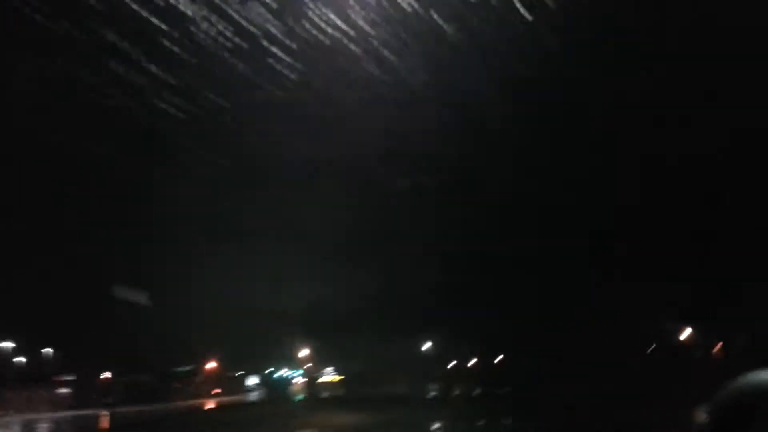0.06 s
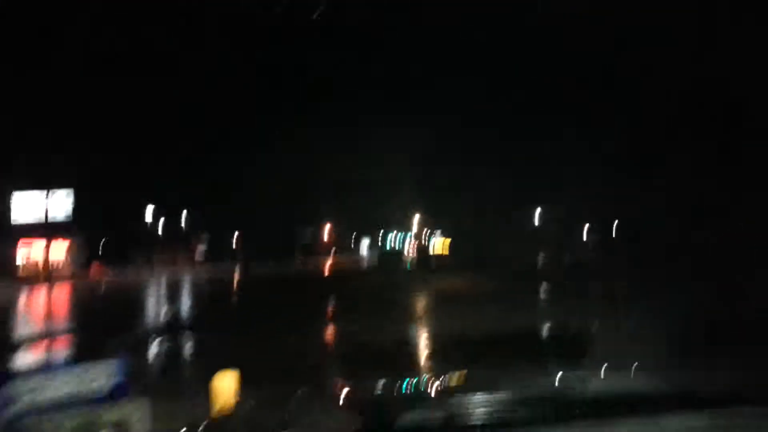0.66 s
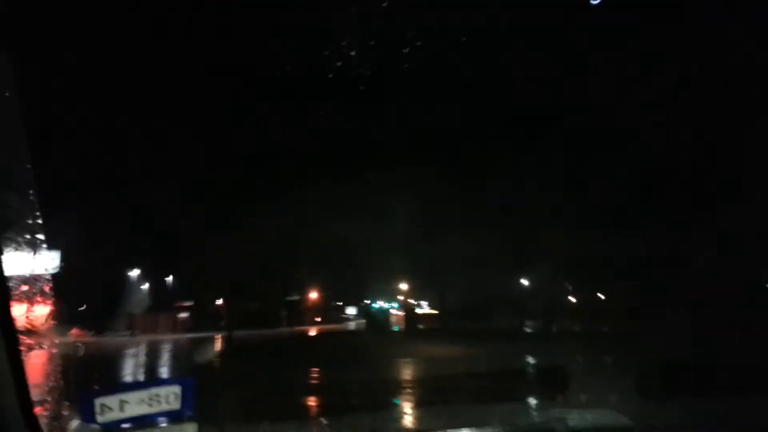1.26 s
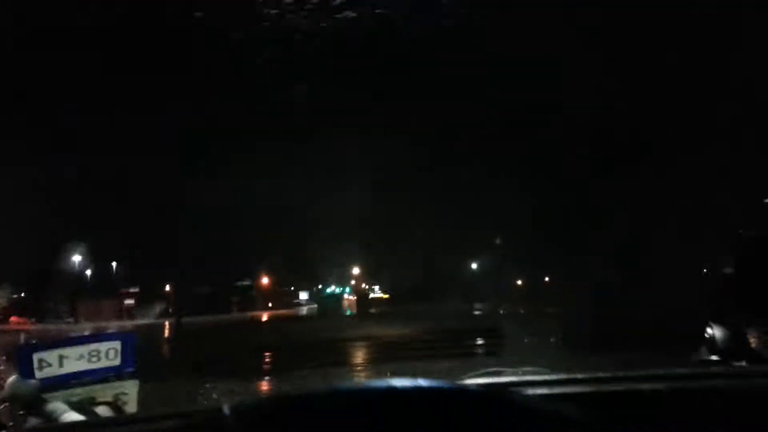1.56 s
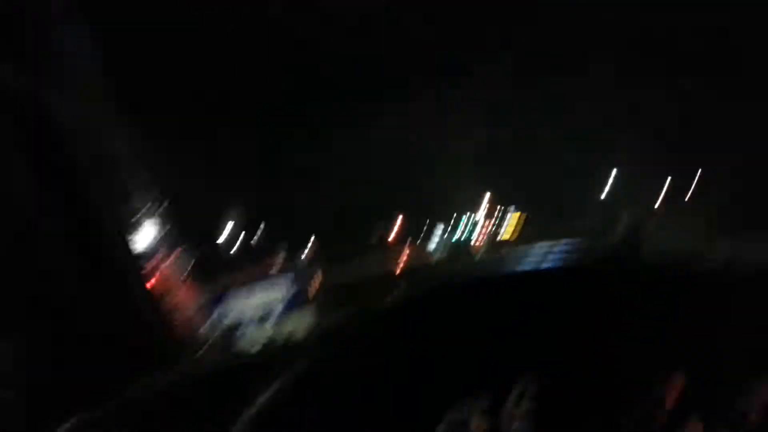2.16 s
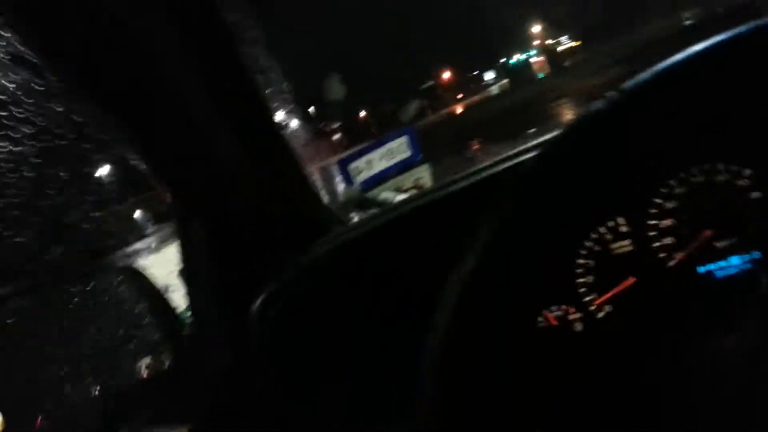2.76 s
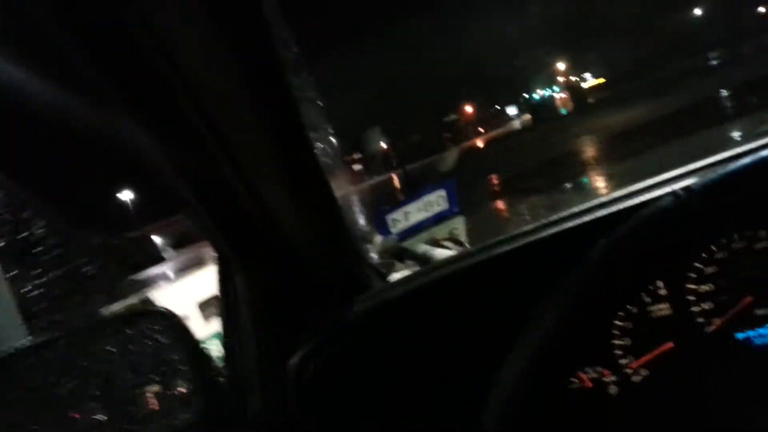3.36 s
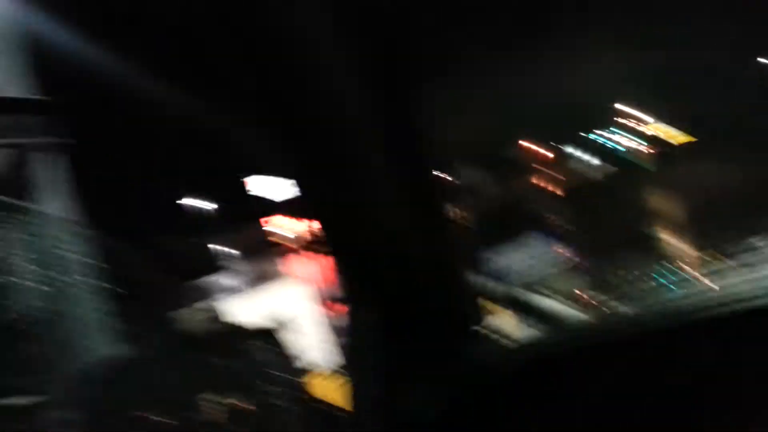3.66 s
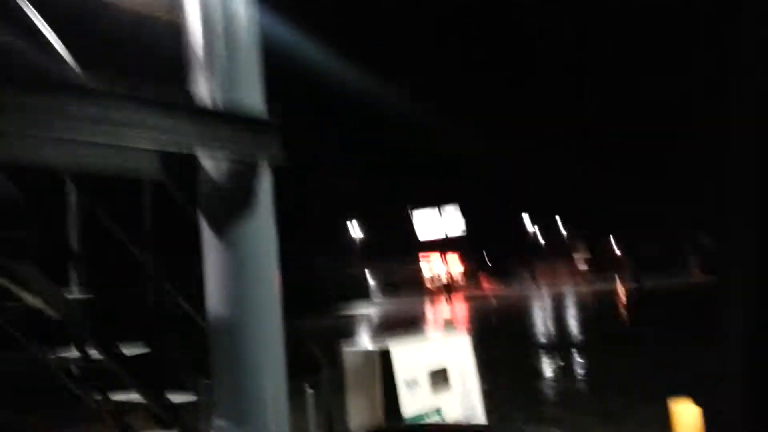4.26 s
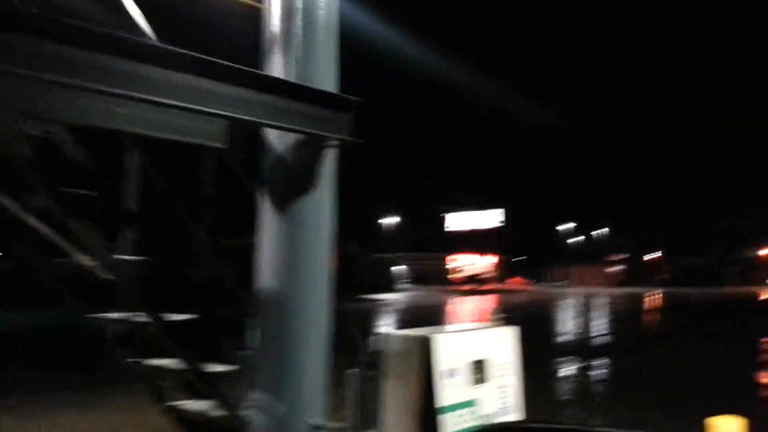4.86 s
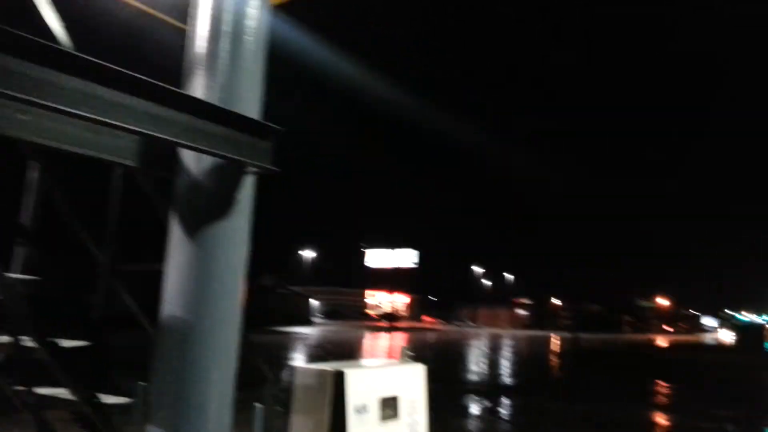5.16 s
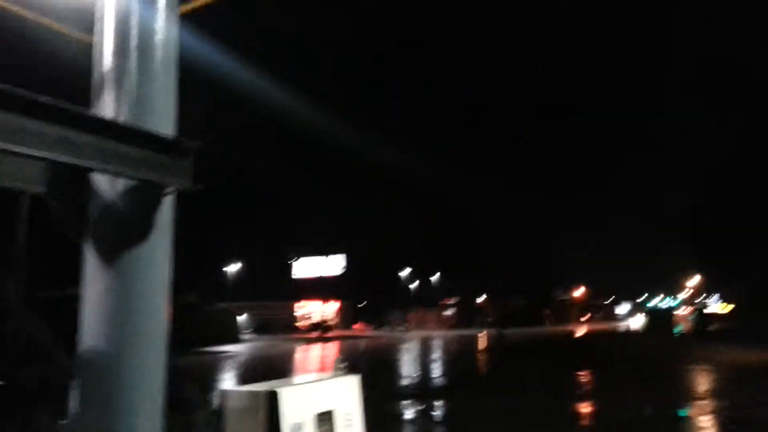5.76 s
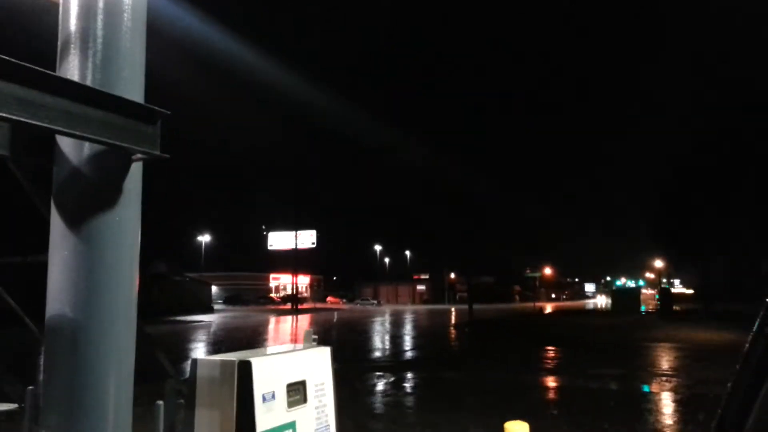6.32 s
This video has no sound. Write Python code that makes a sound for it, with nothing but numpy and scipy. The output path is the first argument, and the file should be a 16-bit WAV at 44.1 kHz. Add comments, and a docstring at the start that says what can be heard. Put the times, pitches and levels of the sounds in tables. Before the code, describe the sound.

It starts quietly inside a closed, idling car: a low rumble and faint engine hum, with rain pattering softly beyond the glass. A small plastic part clacks at the very start. A couple of light ticks and a soft knock come at about 1.1 seconds, then a sleeve brushes faintly, with a brief crackle near 1.9. From 2.4 to 2.9 seconds the door latch clicks and rattles and panels knock dully. The door opens at about 2.8 and a heavy downpour on pavement floods in, its hiss slightly to the left. The rain is hollow at first, then grows louder and fuller until about 4.8 as the microphone is carried outside. Fat drops splash close by and drips ping on thin metal. At 5.3 seconds the microphone is bumped, a dull thump with a ping. The loud, steady rain continues to the end, around 6.4 seconds.

```python
"""Seat of an idling car, night storm. Rain murmurs through the closed cabin; a few things tick, a sleeve
brushes. The latch clicks, panels knock, the door opens and the downpour on the pavement floods in from
the right: a noise wash with splashes and drips pinging on thin metal. It is hollow at first, then louder
and fuller as the microphone is carried outside, where it is bumped once."""
import sys
import numpy as np
from scipy import signal
from scipy.fft import rfft, irfft, next_fast_len
from scipy.io import wavfile
from scipy.ndimage import uniform_filter1d, map_coordinates

SR = 44100
rng = np.random.default_rng(int(sys.argv[2]) if len(sys.argv) > 2 else 0)


def generate_wav(signal):
    """Clip the signal to [-1, 1] and save it as 16-bit WAV at the path in sys.argv[1]."""
    frames = np.transpose(np.atleast_2d(signal))
    scaled = np.clip(frames, -1, 1) * 32767
    pcm = np.round(scaled).astype(np.int16)
    wavfile.write(sys.argv[1], SR, pcm)


N = 281799
TIME_S = np.arange(N) / SR

# rain strength at the microphone on its way out: time_s, level_db
RAIN_STRENGTH = [(2.82, -35.5), (2.9, -31), (3.1, -27.5), (3.21, -28), (3.3, -25), (3.42, -27),
                 (3.72, -24.5), (4.02, -22), (4.18, -19.5), (4.27, -17), (4.46, -20), (4.51, -17),
                 (4.66, -16.5), (4.85, -16), (5.4, -15.5), (5.48, -18), (5.54, -15), (5.7, -17), (5.8, -17),
                 (5.91, -20), (5.95, -16), (6.1, -15.5), (6.22, -15.5), (6.39, -15)]
OPEN_AIR_DB = -16  # that strength in the open
DOOR_OPEN_S, DOOR_SWING_S = 2.76, 0.021


def downpour():
    """Near drops on a wash of far ones. One strength drives drum, hiss and spray; rain sheets surge."""
    colour = [(30, -60), (70, -13), (130, -11), (250, 0), (400, -2), (800, 1), (1200, -2.5), (2300, -2.5),
              (3100, -7), (3900, -9), (5200, -20.5), (6500, -24), (9500, -25.5), (14500, -35.5)]  # rain spectrum: freq_hz, gain_db
    likeness = [(100, 0.93), (330, 1), (650, 1), (950, 0.55), (1600, 0.48), (2400, 0.26), (3700, 0.1),
                (5000, 0.095)]  # left-right likeness: freq_hz, correlation
    left_lag = [(3.8, 0.00034), (4.4, 0.00025)]  # left port's delay, less once it faces out: time_s, lag_s
    even_out_s, gap_loss_db, gap_widen_s = 0.15, 6.5, 0.44
    strength_db = curves(RAIN_STRENGTH)[0] - OPEN_AIR_DB
    wash = rng.standard_normal((2, N)) + amp(-7) * drops(rate_hz=1300, scatter_db=5)
    rain = spread(wash, colour, likeness)
    rain[0] = map_coordinates(rain[0], [np.arange(N) - SR * curves(left_lag)[0]], order=5)
    drum, rest = split(rain, edge_hz=1000)
    hiss, spray = split(rest, edge_hz=5930)
    # drumming comes from a wide area, which evens out the gusts
    even_db = uniform_filter1d(strength_db, int(even_out_s * SR))
    drum = unit(drum) * amp(-22 + 0.99 * even_db + 0.5 * wobble(17)) * pan(-1.2)
    hiss = unit(hiss) * amp(-17 + strength_db + 0.83 * wobble(50)) * pan(1.4)
    # the narrow door gap holds back the spray at first
    gap_db = gap_loss_db * np.exp(-np.maximum(TIME_S - DOOR_OPEN_S, 0) / gap_widen_s)
    spray = unit(spray) * amp(-33.5 + 0.63 * strength_db - gap_db + 0.87 * wobble(12)) * pan(-5.6)
    return door_open() * (drum + hiss + spray)


def near_drops():
    """Heavy drops spat on sill and mirror, each at one port; they sink into the growing wash."""
    colour = [(200, -10), (1000, 20), (3500, -1), (5500, -4), (9000, -17), (14000, -31)]  # drop spectrum: freq_hz, gain_db
    strength_db = curves(RAIN_STRENGTH)[0] - OPEN_AIR_DB
    t = np.arange(SR // 20) / SR
    splash = rng.standard_normal((2, len(t))) * decay(t, t60_s=0.035) * rise(t, tau_s=0.001)
    spatter = signal.fftconvolve(drops(rate_hz=60, scatter_db=4), splash, axes=1)[:, :N]
    return door_open() * unit(coloured(spatter, colour)) * amp(0.55 * strength_db - 34.5) * pan(-2)


def splashes():
    """Fat drops burst right by the microphone."""
    hits = [(3.046, -23.5, -7), (3.175, -23, -4), (3.645, -25, -5), (5.108, -16, -3), (5.508, -17, -1)]  # landings: start_s, level_db, pan_db
    colour = [(300, -15), (1200, 5), (2900, -10), (3700, 5), (6000, -6), (10000, -6), (14000, -18)]  # splash spectrum: freq_hz, gain_db
    return bursts(hits, colour, t60_s=0.038)


def pings():
    """Dripped-on metal and the bumped casing ring four close modes; lesser drips ping at random."""
    # drips beside the door, and the casing's ping as the microphone is bumped (5.303 s): start_s, peak_db
    strikes = [(3.769, -20.5), (3.915, -20.5), (4.266, -15.5), (4.51, -18), (4.802, -15), (5.303, -10),
               (5.515, -16), (5.556, -19), (6.045, -15.5)]
    ping_hz, ring_t60_s, lesser_per_s = 3620, 0.1, 22
    out, t = np.zeros((2, N + SR)), np.arange(SR // 8) / SR
    strength_db = curves(RAIN_STRENGTH)[0] - OPEN_AIR_DB
    open_for_s = N / SR - DOOR_OPEN_S
    hits = [(start_s, peak_db, ping_hz) for start_s, peak_db in strikes]
    for when, size, spot in rng.random((round(lesser_per_s * open_for_s), 3)):
        start_s = DOOR_OPEN_S + when * open_for_s
        peak_db = -24.5 + strength_db[int(start_s * SR)] + 10 * (size - 0.5)
        hits.append((start_s, peak_db, ping_hz * 1.1 * 2 ** -spot))
    for start_s, peak_db, ring_hz in hits:
        mode_hz = ring_hz * (1 + 0.025 * rng.standard_normal((4, 1)))
        phase = 2 * np.pi * (rng.random((4, 1)) + 0.3 * rng.random((2, 4, 1)))
        modes = np.sin(2 * np.pi * mode_hz * t + phase).sum(axis=1)
        ring = modes * decay(t, ring_t60_s) * rise(t, tau_s=0.0014)
        add_at(out, start_s, at_peak(ring, peak_db))
    return out[:, :N]


def knocks():
    """Soft blows set a panel's modes booming in a dull shudder; it is too small to radiate deep bass."""
    blows = [(1.106, -32, 262, 0.13), (2.436, -22.5, 290, 0.058), (2.507, -26.5, 221, 0.16),
             (2.594, -23, 330, 0.22), (2.626, -29.5, 431, 0.29), (2.701, -15, 450, 0.11),
             (2.719, -19.5, 261, 0.11), (2.743, -18.5, 514, 0.1), (2.768, -16.5, 134, 0.35),
             (2.865, -25.5, 150, 0.38), (5.283, -6, 244, 0.11), (5.301, -9.5, 451, 0.27),
             (5.325, -8, 338, 0.058)]  # handle, door and hand: start_s, level_db, boom_hz, t60_s
    panel = [(1, 0), (1.27, -6), (1.6, -5)]  # panel modes: freq_ratio, level_db
    low_cut_hz = 85
    out, t = np.zeros(N + SR), np.arange(SR // 3) / SR
    for start_s, level_db, boom_hz, t60_s in blows:
        dull = lambda hz: resonance(hz, 0.9 * boom_hz, q=0.9) / (1 + (hz / (2.1 * boom_hz)) ** 6)
        shudder = amp(2) * unit(filtered(rng.standard_normal(len(t)), dull))
        modes = sum(amp(db) * np.sin(2 * np.pi * (ratio * boom_hz * t + rng.random()))
                    for ratio, db in panel)
        boom = (modes + shudder) * decay(t, t60_s) * rise(t, tau_s=0.0042)
        add_at(out, start_s, at_peak(boom, level_db))
    return filtered(out[:N], lambda hz: hz ** 4 / (hz ** 4 + low_cut_hz ** 4))


def clicks():
    """Each click or crackle is a bright tick and a short rattle with its own resonance."""
    # clicks of latch, seal and casing, and one crackle of the sleeve (1.898 s):
    # start_s, rattle_db, ring_hz, ring_db, t60_s, pan_db, tick_db
    snaps = [(1.113, -31, 2700, -1, 0.018, 9, -44.5), (1.182, -36, 1060, 7, 0.052, 0, -50),
             (1.898, -34.5, 2800, 12, 0.027, 11, -52), (2.392, -28, 1740, 9, 0.049, 3, -58),
             (2.4355, -26.5, 2070, 2, 0.028, 0, -44), (2.593, -20.5, 1680, 8, 0.1, -2, -72),
             (2.661, -22, 2750, 6, 0.057, 1, -72), (2.742, -21, 1400, 5, 0.073, 2, -72),
             (2.777, -23, 3320, 2, 0.2, -4, -41), (2.88, -23, 3280, 0, 0.05, -2, -37)]
    colour = [(150, 5), (800, 13), (1400, 6.5), (2000, 3.5), (3700, 1.5), (5500, -9.5), (14000, -37)]  # rattle spectrum: freq_hz, gain_db
    out, t = np.zeros((2, N + SR)), np.arange(SR // 3) / SR
    for start_s, rattle_db, ring_hz, ring_db, t60_s, pan_db, tick_db in snaps:
        envelope = (decay(t, t60_s) + decay(t, t60_s=0.0061)) * rise(t, tau_s=0.0028)
        tone = lambda hz: amp(along(colour, hz)) * (1 + amp(ring_db) * resonance(hz, ring_hz, q=5))
        rattle = filtered(rng.standard_normal((2, len(t))) * envelope, tone)
        tick = rng.standard_normal((2, len(t))) * amp(tick_db + 3.5) * decay(t, t60_s=0.023)
        add_at(out, start_s, (at_peak(rattle, rattle_db + 1.5) + tick) * pan(pan_db))
    return out[:, :N]


def clacks():
    """A small plastic part snaps and rattles against plastic."""
    hits = [(0.0379, -21, 6), (0.0444, -22, 5), (0.0578, -31, 0)]  # strikes: start_s, level_db, pan_db
    colour = [(700, -14), (1400, -4), (1950, 2.5), (2800, -18), (3600, -11), (5700, -17), (6400, -29),
              (9100, -26), (14000, -36)]  # strike spectrum: freq_hz, gain_db
    return bursts(hits, colour, t60_s=0.019)


def cabin():
    """The body shell rumbles; rain patters faintly beyond the glass."""
    colour = [(25, -27), (55, -10), (140, 1.5), (320, -3), (650, -9.5), (1200, -15.5), (2500, -19.5),
              (3600, -19.5), (4500, -29), (6200, -36), (10000, -33.5)]  # cabin spectrum: freq_hz, gain_db
    likeness = [(120, 0.98), (350, 0.81), (600, 0.55), (900, 0.22), (3000, .03)]  # left-right likeness: freq_hz, correlation
    shell = [(0.1, -41.5), (0.45, -44.5), (0.7, -40), (0.92, -41), (1.1, -42), (1.3, -42.5), (2.15, -42.5),
             (2.4, -40.5)]  # shell rumble: time_s, level_db
    swells = [(0.1, -50.5), (0.57, -51.5), (1.25, -48), (1.57, -47.5), (2.15, -51), (2.35, -49.5)]  # rain beyond the glass: time_s, level_db
    swell_db = curves(swells)[0] - np.mean(swells, axis=0)[1]
    taps = amp(-6) * drops(rate_hz=600, scatter_db=3)
    murmur = spread(rng.standard_normal((2, N)) + taps, colour, likeness)
    rumble, patter = split(murmur, edge_hz=620)
    rumble = unit(rumble) * amp(curves(shell)[0] + 0.58 * wobble(8.92))
    return rumble + unit(patter) * amp(-47.5 + swell_db)


def cloth():
    """Fibres catch and slip near the left port; each stroke swells and fades equally fast."""
    strokes = [(1.52, -51.5, 0.22), (1.72, -52, 0.024), (1.885, -37, 0.037), (1.995, -49.5, 0.043),
               (2.26, -47.5, .022), (2.405, -44.5, 0.035), (2.542, -48, 0.0072), (3.05, -42, 0.023),
               (3.3, -44, 0.12)]  # arm reaching for the door: peak_s, level_db, tau_s
    colour = [(200, -28), (1000, 1.5), (3500, -2), (6000, -8), (10000, -7.5), (14000, -1.5)]  # fibre spectrum: freq_hz, gain_db
    envelope = sum(amp(db) * np.exp(-np.abs(TIME_S - peak_s) / tau_s) for peak_s, db, tau_s in strokes)
    catches = drops(rate_hz=900, scatter_db=3)
    fibres = coloured(rng.standard_normal((2, N)) + catches, colour)
    return unit(fibres) * envelope * pan(4)


def engine():
    """The idle hums on low multiples of a slightly unsteady firing rate."""
    harmonics = [(2, -51), (3, -53.5)]  # idle hum: firing_multiple, rms_db
    firing_hz = 38.36
    phase = 2 * np.pi * np.cumsum(firing_hz * (1 + 0.0036 * wobble(4.2))) / SR
    return sum(np.sqrt(2) * amp(db + 1.5 * wobble(2.8)) * np.sin(round(k) * phase) for k, db in harmonics)


def sleeve_rub():
    """A sleeve slides over the trim: a faint, narrow whisper that sinks in pitch."""
    slide = [(1.1, 1770, -61), (1.42, 1468, -55.5), (1.72, 1430, -57), (1.9, 1410, -72)]  # sleeve on trim: time_s, pitch_hz, level_db
    half_width_hz = 82
    pitch_hz, level_db = curves(slide)
    flutter = filtered(rng.standard_normal((2, N)), lambda hz: 1 / (1 + (hz / half_width_hz) ** 4))
    whisper = unit(flutter * np.sin(2 * np.pi * np.cumsum(pitch_hz) / SR))
    sliding = (TIME_S > slide[0][0]) & (TIME_S < slide[-1][0])
    return whisper * amp(level_db) * sliding


def hollows(x):
    """Two hollows ring in and out as the microphone moves through them."""
    nook = [(144, 39, 7.5), (910, 190, 4.5), (1493, 200, 4.5), (2098, 192, 8), (3530, 200, 4.5)]  # modes between wheel, window and door: centre_hz, width_hz, gain_db
    in_nook = [(1.0, 0.11), (1.4, 0.6), (1.75, 0.44), (2.099, 0.079), (2.7, 0.16), (3.0, 0.58), (3.8, 1),
               (4.4, 0.56)]  # part heard through the nook: time_s, share
    doorway = [(516, 86, 3.5), (755, 87, 8.5), (3620, 300, 4), (4560, 720, 9)]  # modes between door and pillar: centre_hz, width_hz, gain_db
    in_doorway = [(3.2, 0.054), (3.8, 0.76), (4.3, 0.36), (5.0, 0.25)]  # part heard through the doorway: time_s, share
    for modes, path, loss_db in [(nook, in_nook, 2.5), (doorway, in_doorway, 1.46)]:
        share = np.clip(curves(path)[0], 0, 1)
        x = (1 - share) * x + share * resonated(x, modes, loss_db)
    return x


def cabin_echo(x, echo_db):
    """Glass and trim add a short dense echo, different at each port."""
    t = np.arange(SR // 4) / SR
    tail = rng.standard_normal((2, len(t))) * decay(t, t60_s=0.16) * rise(t, tau_s=0.004)
    return x + amp(echo_db) * signal.fftconvolve(x, tail / np.linalg.norm(tail[0]), axes=1)[:, :N]


def door_open():
    """0 while the door is shut, 1 once it has left its seal."""
    return np.clip((TIME_S - DOOR_OPEN_S) / DOOR_SWING_S, 0, 1)


def drops(rate_hz, scatter_db):
    """Two streams of random impacts: many far and weak, a few near and strong."""
    falls = rng.random((2, N)) < rate_hz / SR
    size = amp(scatter_db * np.minimum(rng.standard_normal((2, N)), 2.5))
    return unit(falls * size * rng.choice([-1, 1], (2, N)))


def bursts(hits, colour, t60_s):
    """One short burst of coloured noise per hit."""
    out, t = np.zeros((2, N + SR)), np.arange(SR // 10) / SR
    for start_s, level_db, pan_db in hits:
        burst = coloured(rng.standard_normal((2, len(t))) * decay(t, t60_s), colour)
        add_at(out, start_s, at_peak(burst, level_db) * pan(pan_db))
    return out[:, :N]


def amp(db):
    """Decibels to gain."""
    return 10 ** (np.asarray(db) / 20)


def pan(db):
    """Stereo gains, left db above right."""
    return amp([[db / 2], [-db / 2]])


def unit(x):
    """x at rms 1."""
    return x / np.sqrt(np.mean(x ** 2) + 1e-20)


def at_peak(x, db):
    """x with its peak at db."""
    return x / np.abs(x).max() * amp(db)


def add_at(out, start_s, x):
    """Mix x into out."""
    out[..., round(start_s * SR):][..., :x.shape[-1]] += x


def rise(t, tau_s):
    """Exponential attack."""
    return 1 - np.exp(-t / tau_s)


def decay(t, t60_s):
    """Fall of 60 dB per t60_s."""
    return amp(-60 * t / t60_s)


def along(points, hz):
    """(freq_hz, value) points read on a log axis."""
    freq_hz, values = np.transpose(points)
    return np.interp(np.log(hz + 1), np.log(freq_hz + 1), values)


def curves(rows):
    """One value per sample for each column after the time."""
    time_s, *columns = np.transpose(rows)
    return [np.interp(TIME_S, time_s, column) for column in columns]


def wobble(rate_hz):
    """Smooth random curve, rate_hz knots a second."""
    knots = rng.standard_normal(int(N * rate_hz / SR) + 4)
    return map_coordinates(knots, [TIME_S * rate_hz])


def filtered(x, response):
    """x through a complex frequency response."""
    size = x.shape[-1]
    padded = next_fast_len(size + SR // 4)
    return irfft(rfft(x, padded) * response(np.fft.rfftfreq(padded, 1 / SR)), padded)[..., :size]


def coloured(x, colour):
    """x through a (freq_hz, gain_db) curve."""
    return filtered(x, lambda hz: amp(along(colour, hz)))


def resonated(x, modes, loss_db):
    """x through (centre_hz, width_hz, gain_db) humps and a flat loss."""
    humps_db = lambda hz: sum(db / (1 + (2 * (hz - centre) / width) ** 2) for centre, width, db in modes)
    return filtered(x, lambda hz: amp(humps_db(hz) - loss_db))


def split(x, edge_hz):
    """The parts of x below and above an edge."""
    low = filtered(x, lambda hz: 1 / (1 + (hz / edge_hz) ** 6))
    return low, x - low


def resonance(hz, centre_hz, q):
    """Response of one damped mode."""
    damping = 1j * hz * centre_hz / q
    return damping / (centre_hz ** 2 - hz ** 2 + damping)


def spread(pair, colour, likeness):
    """Two unrelated signals become a coloured left and right, alike in the bass."""
    turn = lambda hz: np.arccos(np.clip(along(likeness, hz), -1, 1)) / 2
    mid, side = filtered(pair, lambda hz: amp(along(colour, hz)) * [np.cos(turn(hz)), np.sin(turn(hz))])
    return unit(np.array([mid + side, mid - side]))


def scene():
    """Everything that reaches the microphone's two ports."""
    rain = hollows(downpour() + cabin()) + near_drops() + splashes()
    return (rain + engine() + cloth() + sleeve_rub() + pings()
            + cabin_echo(clicks() + clacks(), echo_db=-4.5) + knocks())


def record(dry):
    """The housing colours the sound, the loudest peaks round off, the top of the band is cut."""
    housing = [(268, 52, 1.5), (1455, 35, 3), (1980, 114, 2), (2620, 460, 3.5), (3325, 420, 3),
               (4260, 150, 3.5)]  # microphone housing modes: centre_hz, width_hz, gain_db
    ceiling, top_hz = 0.95, 14720
    heard = resonated(dry, housing, loss_db=0.59)
    rounded = heard / (1 + np.abs(heard / ceiling) ** 8) ** (1 / 8)
    return filtered(rounded, lambda hz: hz < top_hz)


dry = scene()
out = record(dry)
generate_wav(out)
```